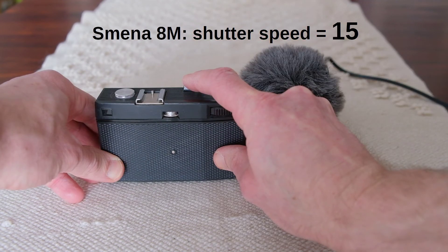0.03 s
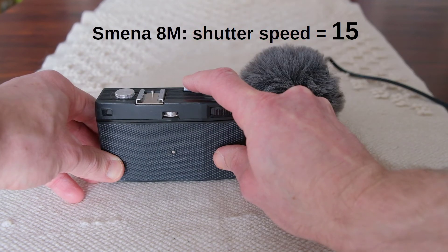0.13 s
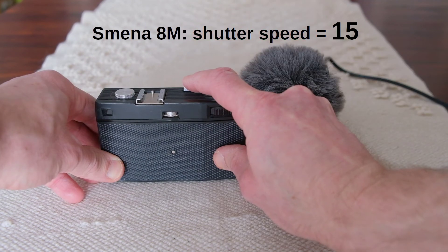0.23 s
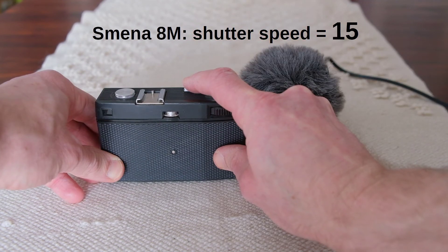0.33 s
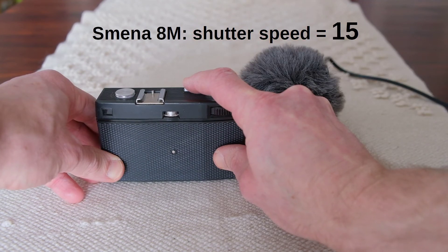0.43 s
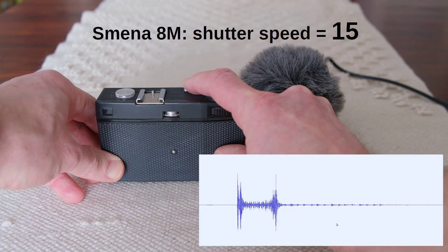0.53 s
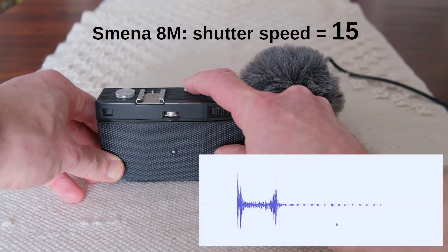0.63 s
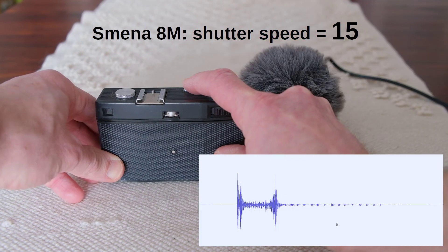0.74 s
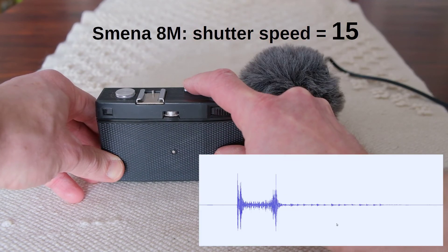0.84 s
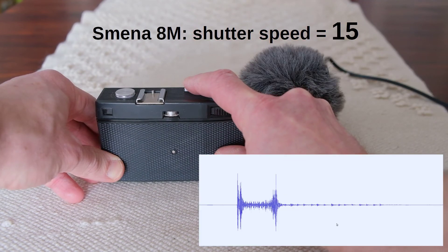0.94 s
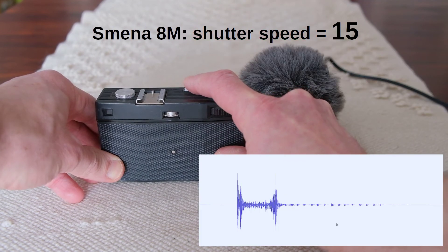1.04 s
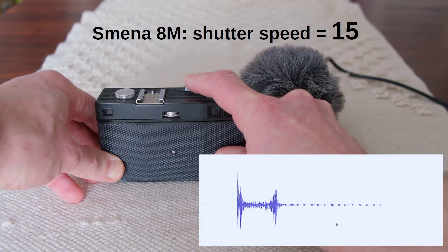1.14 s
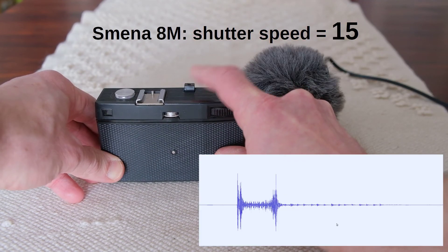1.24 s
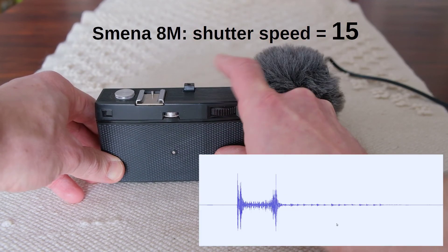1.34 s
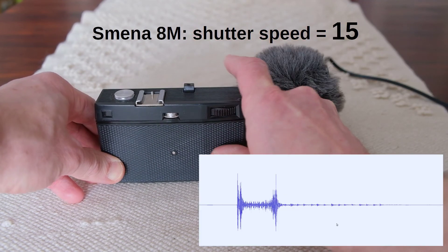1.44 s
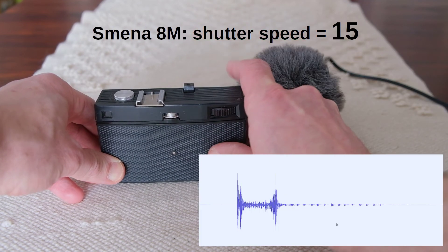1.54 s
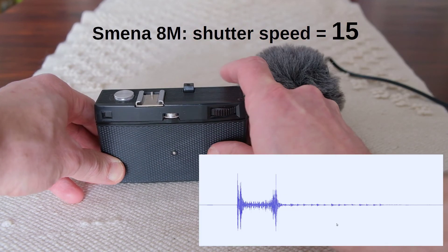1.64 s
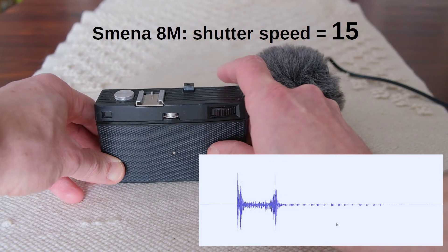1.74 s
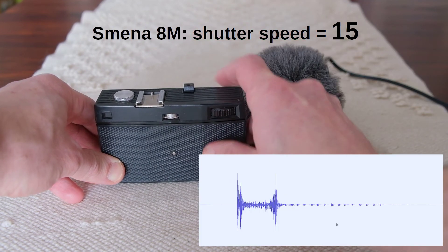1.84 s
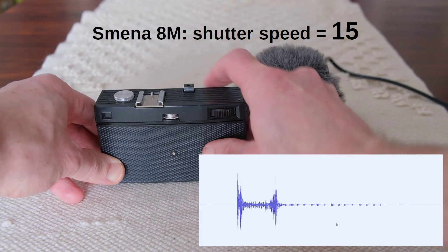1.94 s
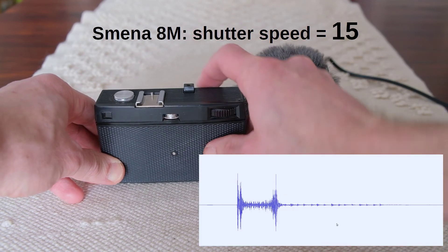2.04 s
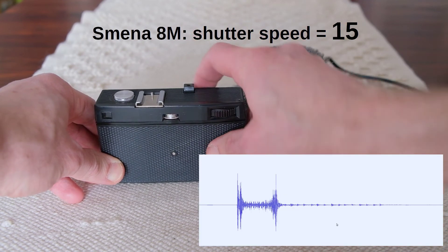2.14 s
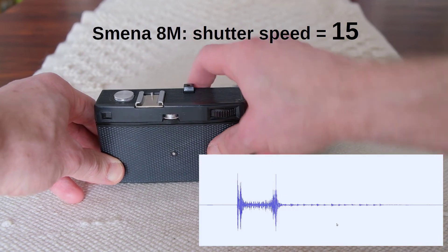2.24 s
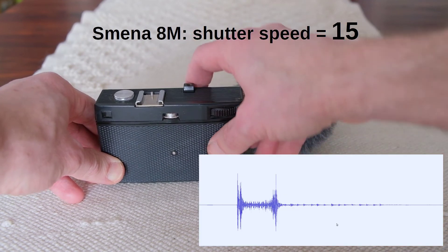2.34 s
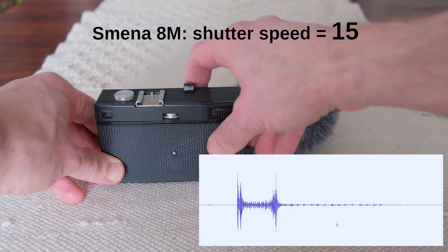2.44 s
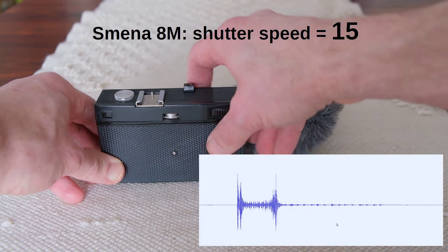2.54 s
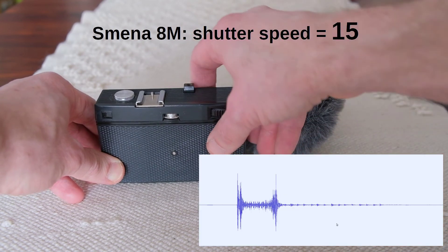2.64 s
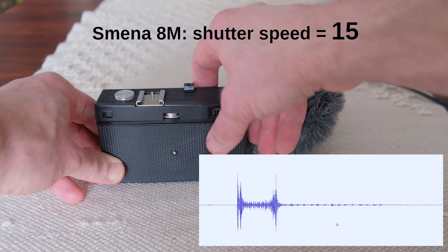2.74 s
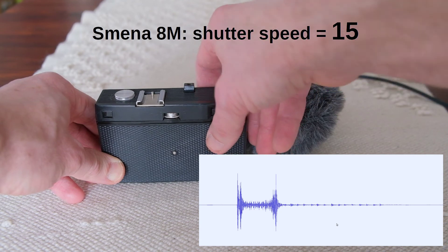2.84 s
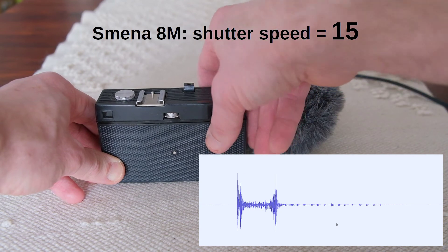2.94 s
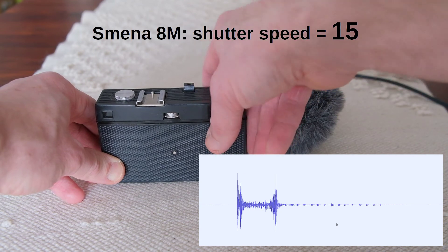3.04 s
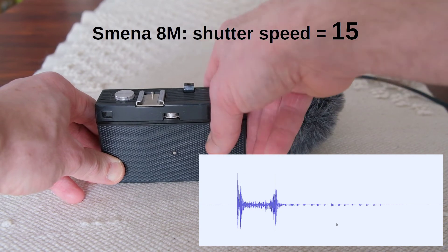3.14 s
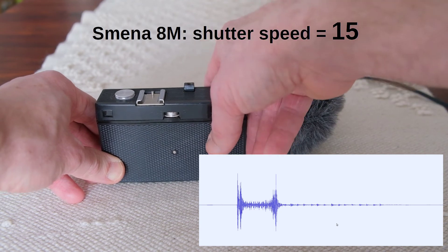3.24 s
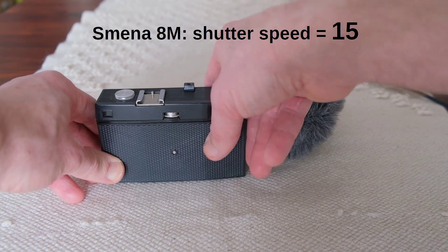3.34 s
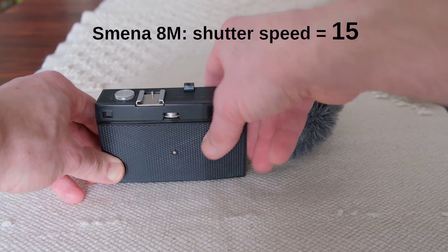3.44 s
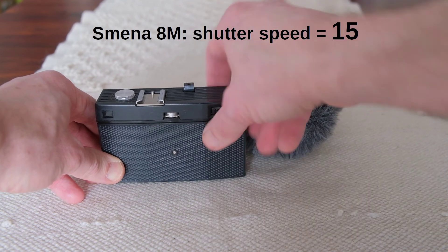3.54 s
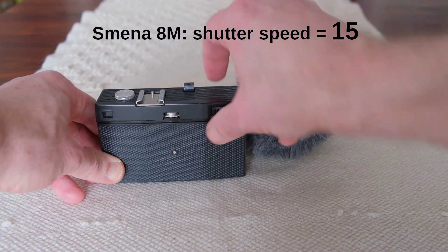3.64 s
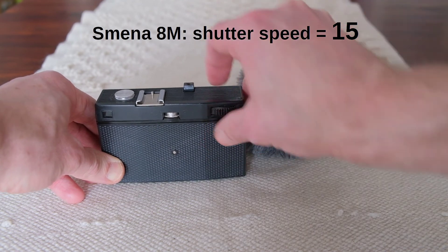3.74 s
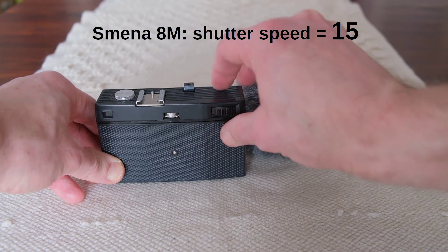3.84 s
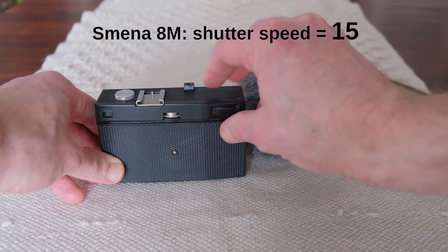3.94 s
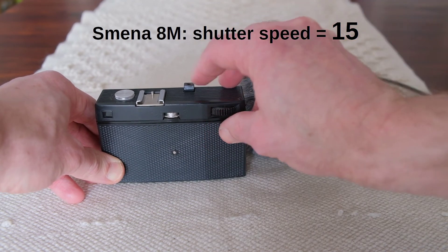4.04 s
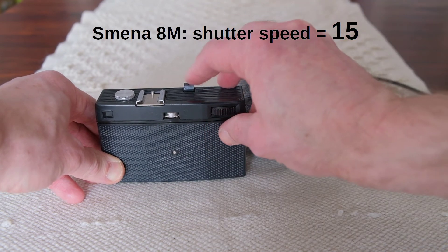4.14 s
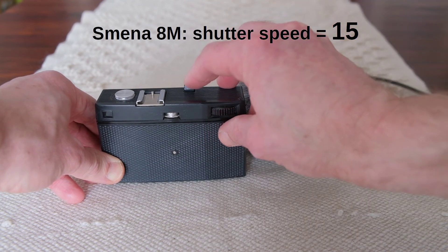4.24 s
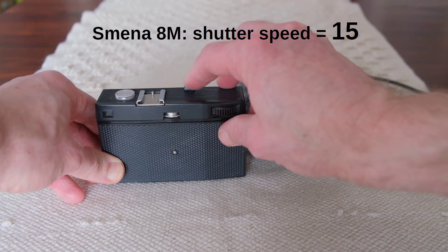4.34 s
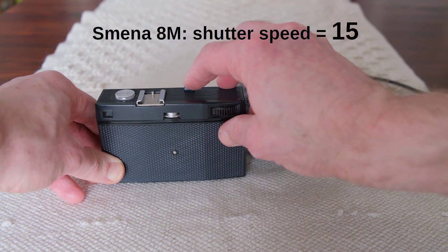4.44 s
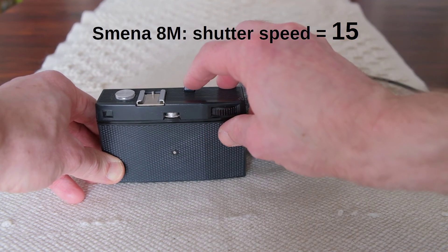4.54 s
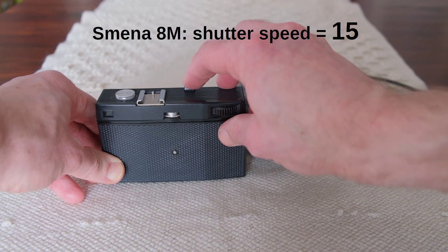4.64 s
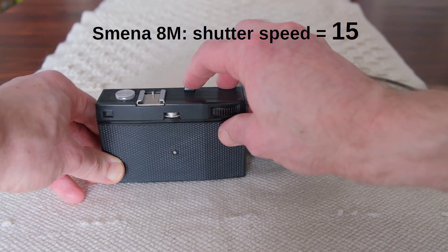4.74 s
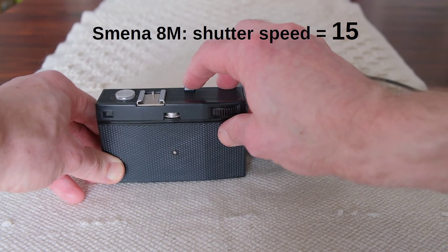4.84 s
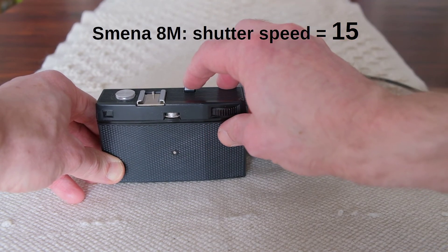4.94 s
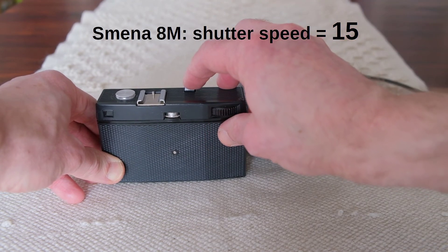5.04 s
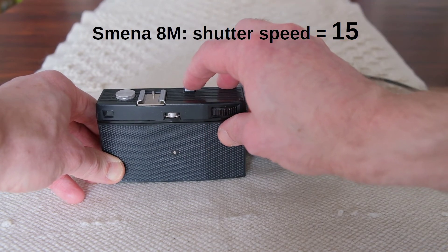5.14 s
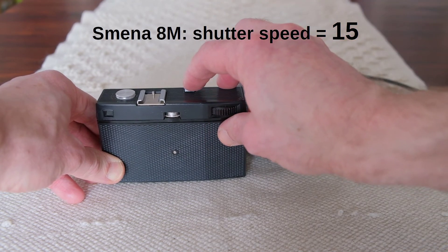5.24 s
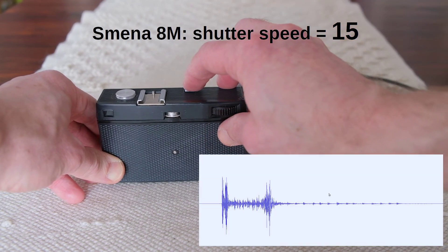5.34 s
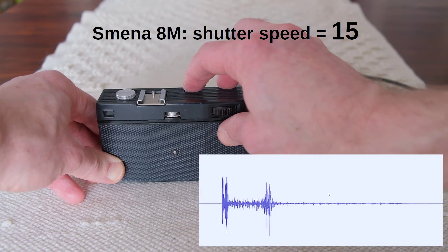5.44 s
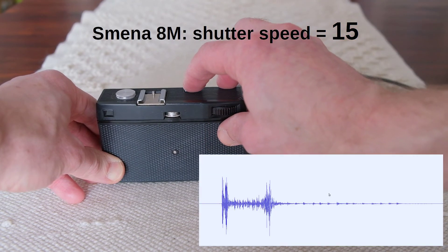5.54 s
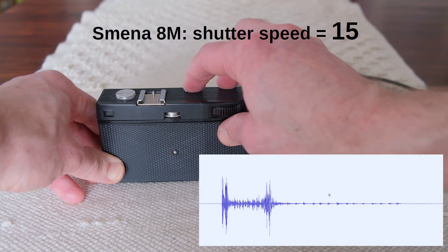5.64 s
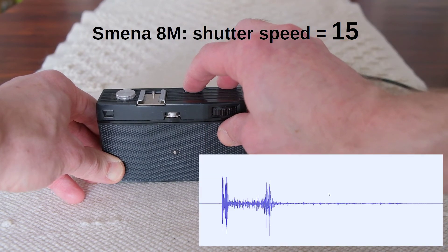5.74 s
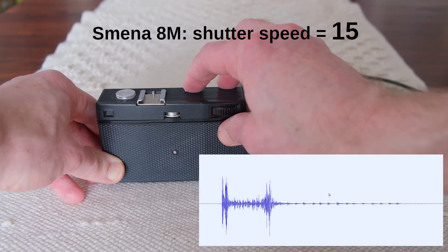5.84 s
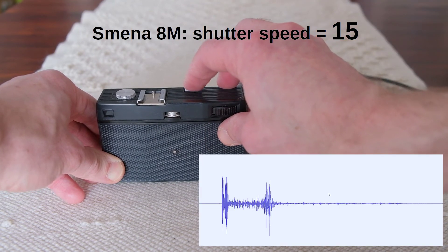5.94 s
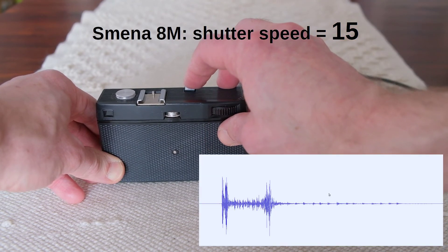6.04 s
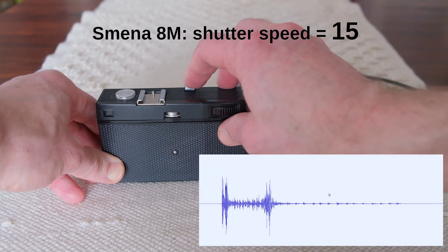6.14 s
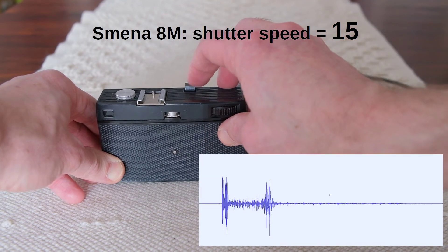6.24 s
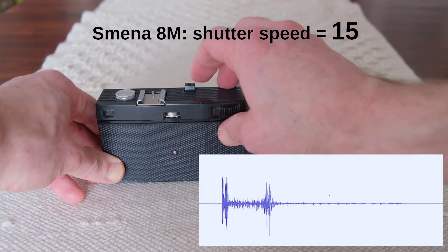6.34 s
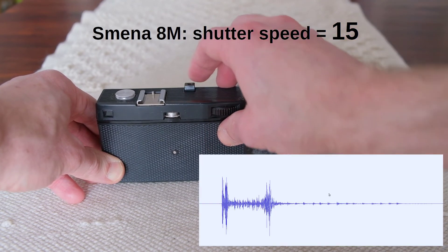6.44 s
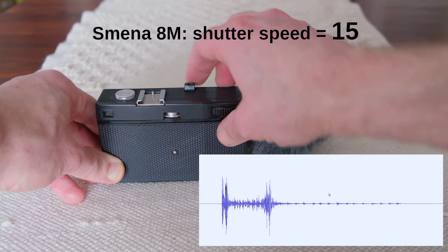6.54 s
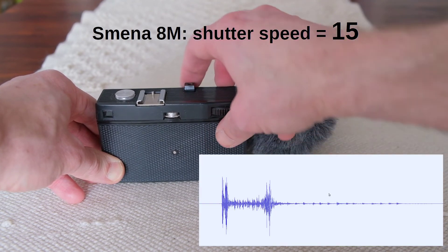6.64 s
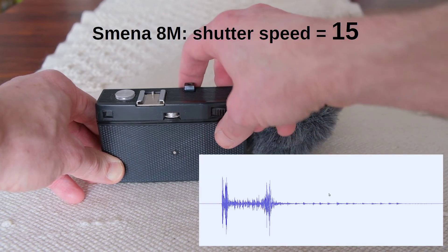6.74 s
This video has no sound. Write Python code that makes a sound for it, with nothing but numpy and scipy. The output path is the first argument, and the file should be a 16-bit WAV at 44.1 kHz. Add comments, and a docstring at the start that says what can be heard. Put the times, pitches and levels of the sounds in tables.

```python
"""The leaf shutter of a small film camera is fired, cocked and fired again close to a microphone in a quiet room.
Impacts of blades, escapement and gears excite the resonant housing, while struck steel rings on.
Between firings the hand shifts its grip, latches the cocking lever, drags over cloth and brushes
the microphone's fur: knocks excite the plastic case, and rubbing is coloured noise that swells and fades.
Arm rumble and still air lie beneath; a faint diffuse echo follows the sounds of the camera and table."""
import sys
import numpy as np
from scipy import signal
from scipy.fft import rfft, irfft, next_fast_len
from scipy.io import wavfile
from scipy.ndimage import uniform_filter1d

SR = 44100
rng = np.random.default_rng(int(sys.argv[2]) if len(sys.argv) > 2 else 0)


def master(y):
    """Save y as 16-bit WAV."""
    cut = np.clip(np.atleast_2d(y).T, -1, 1)
    pcm = np.round(cut * 32767)  # scale
    wavfile.write(sys.argv[1], SR, pcm.astype(np.int16))


N = 299439
TIME = np.arange(N) / SR   # seconds


def from_db(db):
    """Level law: decibels to amplitude gain."""
    return 10 ** (np.asarray(db) / 20)


def rms_one(x):
    """Power normalisation: scale to a root mean square of one."""
    return x / np.sqrt(np.mean(x ** 2) + 1e-20)


def at_hz(points, hz):
    """Spectral interpolation: read (Hz, value) points on a logarithmic frequency axis."""
    f, value = np.transpose(points)
    return np.interp(np.log(np.maximum(hz, 1)), np.log(f), value)


def add(track, s, sound):
    """Superposition: mix a short sound into a track at time s."""
    i = round(s * SR)
    track[i:i + len(sound)] += sound[:max(N - i, 0)]


def clicks(rows):
    """Impulsive excitation: one single-sample click for each (s, dB) row."""
    track = np.zeros(N)
    for s, db in rows:
        add(track, s, from_db([db]))
    return track


def noise(spectrum, grain_db=0, size=128):
    """Filtered random noise of unit power, its strength wandering between grains of size samples."""
    count = N // size + 2
    grains = np.interp(np.arange(N) / size, np.arange(count), rng.standard_normal(count))
    grainy = rng.standard_normal(N) * from_db(grain_db * grains)
    n = next_fast_len(N)
    hz = np.arange(n // 2 + 1) * SR / n
    colour = from_db(at_hz(spectrum, hz))
    return rms_one(irfft(rfft(grainy, n) * colour, n)[:N])


# each rub lies this far down at its two ends; roundness of its crest (1 = pointed)
STROKE_ENDS_DB, STROKE_ROUNDNESS = 19, 1.25


def strokes(rows):
    """Amplitude envelope of friction: each (middle s, length s, dB) rub swells and fades."""
    gain = np.zeros(N)
    for middle, length, db in rows:
        from_crest = np.minimum(np.abs(2 * (TIME - middle) / length), 4)
        gain += from_db(db - STROKE_ENDS_DB * from_crest ** STROKE_ROUNDNESS)
    return gain


def ring(plucks, hz, t60):
    """Free decay of one mode: a unit click starts a sine of height 1, 60 dB down after t60 seconds."""
    r, w = from_db(-60 / (t60 * SR)), 2 * np.pi * hz / SR
    return signal.lfilter([0, np.sin(w)], [1, -2 * r * np.cos(w), r * r], plucks + 1e-18)


def resonate(force, modes):
    """Modal superposition: parallel resonances of alternating sign respond to a force."""
    out = np.zeros(N)
    for k, (hz, width, db) in enumerate(modes):
        r = np.exp(-np.pi * width / SR)
        poles = [1, -2 * r * np.cos(2 * np.pi * hz / SR), r * r]
        response = (1 - r * r) / 2 * signal.lfilter([1, 0, -1], poles, force + 1e-18)
        out += (-1) ** k * from_db(db) * response
    return out


def minimum_phase(log_gain):
    """Causality: the minimum-phase filter with this gain, from the folded cepstrum."""
    cepstrum = irfft(log_gain)
    half = len(cepstrum) // 2
    cepstrum[1:half] *= 2
    cepstrum[half + 1:] = 0
    return np.exp(rfft(cepstrum))


# Where a blow's bright edge acts. Each row: frequency in Hz, weight on the edge level.
EDGE_SHARES = [(9500, 0.015), (11500, 1)]


def contact(impact_db, thud_db, edge_db, decay_ms, after_db, after_ms, thud_shares, size=4096, smooth_hz=130):
    """Impact force: a quickly dying rattle of tiny touches, then a fainter shiver of loose parts."""
    ms = 1000 * np.arange(size) / SR
    hz = np.arange(size // 2 + 1) * SR / size
    envelope = np.exp(-ms / decay_ms) + from_db(after_db) * np.exp(-ms / after_ms)
    rattle = rfft(rng.standard_normal(size) * envelope)
    # the hardness of the contact sets its spectrum; chance sets only its fine structure
    power = uniform_filter1d(np.abs(rattle) ** 2, max(round(smooth_hz / hz[1]), 1))
    colour = from_db(impact_db + thud_db * at_hz(thud_shares, hz) + edge_db * at_hz(EDGE_SHARES, hz))
    return irfft(rattle * minimum_phase(np.log(colour / np.sqrt(power))))[:size // 2]


# The moving arm. Each row: time in seconds, rumble level in dB before the trim.
ARM_LEVEL = [(0.0, -71), (0.74, -65), (1.28, -67.5), (1.53, -64.5), (2.15, -56.5), (2.31, -54), (2.46, -52),
             (2.91, -63.5), (3.29, -59), (3.48, -61.5), (3.74, -61), (4.1, -69), (4.39, -73.5), (4.61, -73),
             (4.73, -70), (5.35, -70.5), (5.45, -71.5), (6.79, -68.5)]
# Colour of the rumble. Each row: frequency in Hz, relative level in dB.
RUMBLE_COLOUR = [(12, -33), (20, 8.5), (59, -14), (174, -23), (225, -28.5), (263, -28), (392, -35),
                 (600, -32), (780, -64.5), (1320, -120)]


def arm_rumble(trim_db=6.0):
    """Structure-borne noise: the arm moving on the table gives a low, slowly varying rumble."""
    level_db = trim_db + np.interp(TIME, *np.transpose(ARM_LEVEL))
    return from_db(level_db) * noise(RUMBLE_COLOUR, grain_db=2.0, size=1024)


# Colour of the quiet room's air. Each row: frequency in Hz, relative level in dB.
AIR_COLOUR = [(59, -30), (100, -1.5), (166, -11), (295, -15), (595, -23), (648, -12.5), (691, -21.5),
              (752, -19), (1520, -24.5), (3400, -28.5), (6700, -30.5), (15000, -29.5), (16000, -39)]


def air(level_db=-73.5):
    """Stationary background noise: the air of the room at a steady level."""
    return from_db(level_db) * noise(AIR_COLOUR)


# Hard clicks: a tap, the mechanism coming to rest, the cocking lever and the case.
# Each row: time in seconds, impact level in dB, thud in dB, edge in dB, rattle decay in ms.
HARD_CLICKS = [(0.081, -43, 17, -6, 6.6), (0.7723, -30.5, -2, -2, 1.1), (2.423, -30.5, 9.5, 6, 1),
               (2.5195, -23.5, 15, -13, 6.4), (2.555, -19, 5, -9, 2.4), (2.6637, -26.5, 3.5, -6, 3.4),
               (2.988, 5.5, -5.5, -4, 1.3), (3.0762, -3, 1, 1, 2.8), (3.0905, -6, 4, -4, 1.7),
               (3.0930, 7, -2.5, -9.5, 1.8), (3.2016, -16.5, 11.5, -31, 2.1), (5.964, -34, -1, -1, 4.5),
               (5.99, -40.5, 17, -3, 3), (6.12, -46.5, 16, -11, 2.1), (6.514, -35, 15.5, -15, 2.1)]
# Where a hard click's thud acts. Each row: frequency in Hz, weight on the thud level.
CASE_THUD_SHARES = [(700, 1.02), (1500, 0.9), (2200, 0.72), (3500, 0.028)]


def hard_clicks():
    """Hard impact: a tap, the mechanism coming to rest, the cocking lever and the case, as a force on the case."""
    force = np.zeros(N)
    for s, db, thud_db, edge_db, decay_ms in HARD_CLICKS:
        click = contact(db, thud_db, edge_db, decay_ms, after_db=-31, after_ms=5.9,
                        thud_shares=CASE_THUD_SHARES)
        add(force, s, click)
    return force


# Soft bumps of the hand on the padded table. Each row: time in seconds, level in dB.
HAND_BUMPS = [(0.083, -40), (1.785, -54), (1.914, -52.5), (3.094, -40.5), (3.81, -44), (4.56, -52.5),
              (5.95, -50)]


def table_bumps():
    """Damped low modes: a bump of the hand sets two short-lived resonances of the table going."""
    bumps = clicks(HAND_BUMPS)
    return ring(bumps, hz=80, t60=0.072) + from_db(-6.5) * ring(bumps, hz=138.0, t60=0.071)


# The firings, also read by the escapement and gears. Each row: release in seconds, exposure in seconds,
# escapement beats per second, extra thud on closing in dB, extra edge on opening in dB,
# wait from closing to the gears' return in seconds.
FIRINGS = [(0.5400, 0.0555, 345, 1.15, -3.5, 0.0228), (5.374, 0.0555, 380, -1.3, 3, 0.0215)]
# The blades fly open and hit their stop. Each row: delay after release in seconds, impact level in dB,
# thud in dB, edge in dB, rattle decay in ms, spring pluck in dB.
OPENING_BLOWS = [(0, 22, -1, -5.5, 1.15, -30), (0.0043, 18.5, -3.5, 1.2, 1.3, -20.5)]
# They scrape together and slam shut. Each row: delay from the end of the exposure in seconds,
# then impact, thud, edge, rattle decay and spring pluck in the same units.
CLOSING_BLOWS = [(-0.0039, 15.8, 0, -4, 2.2, -29), (0, 17, 6.5, -1.5, 0.9, -25)]
# Where the thud of blades, and of gear ticks, acts. Each row: frequency in Hz, weight on the thud level.
BLADE_THUD_SHARES = [(450, 0.35), (1200, 1.0), (2750, 1.1), (3200, 0.018)]


def blades():
    """Impulsive impact: two blows open the shutter and two close it; gives housing force and spring plucks."""
    force, plucks = np.zeros(N), np.zeros(N)
    for release, exposure, _, slam_db, snap_db, _ in FIRINGS:
        opening = release, OPENING_BLOWS, 0, snap_db
        closing = release + exposure, CLOSING_BLOWS, slam_db, 0
        for start, blows, heavy_db, bright_db in (opening, closing):
            for delay, db, thud_db, edge_db, decay_ms, pluck_db in blows:
                blow = contact(db, thud_db + heavy_db, edge_db + bright_db, decay_ms,
                               after_db=-33, after_ms=6, thud_shares=BLADE_THUD_SHARES)
                add(force, start + delay, blow)
                add(plucks, start + delay, from_db([pluck_db]))
    return force, plucks


# Where an escapement beat's thud acts. Each row: frequency in Hz, weight on the thud level.
BEAT_THUD_SHARES = [(300, 3.5), (1000, 0.73), (2700, 0.57), (3200, -0.5)]
# engages this long after release; mean strength of a beat
ESCAPEMENT_DELAY_S, BEAT_DB = 0.0125, 2.5


def escapement(thud_db=-2.0, edge_db=-2.0, decay_ms=0.85, uneven_db=1.5, jitter_s=0.00035):
    """Near-periodic impacts: the anchor rocks on the star wheel during the exposure, a slightly uneven buzz."""
    force = np.zeros(N)
    for release, exposure, per_s, *_ in FIRINGS:
        for s in release + np.arange(ESCAPEMENT_DELAY_S, exposure, 1 / per_s):
            late, strong = rng.standard_normal(2)
            beat = contact(BEAT_DB + uneven_db * strong, thud_db, edge_db, decay_ms,
                           after_db=-22.5, after_ms=2, thud_shares=BEAT_THUD_SHARES)
            add(force, s + jitter_s * late, beat)
    return force


# one tick per tooth at this spacing; strength and thud of the first tick, before chance
TOOTH_S, TICK_DB, TICK_THUD_DB = 0.01003, -7.0, -4.0
TICK_FADE_DB_PER_S = 31   # the ticks weaken as the spring unwinds


def gears(count=14, uneven_db=2.5, uneven_thud_db=4.5, jitter_s=0.0005, pluck_db=-44):
    """Impact train: gears run back steadily, each tooth with its own strength and colour; force and plucks."""
    force, plucks = np.zeros(N), np.zeros(N)
    for release, exposure, *_, wait in FIRINGS:
        for tooth, (late, strong, dull) in enumerate(rng.standard_normal((count, 3))):
            run_s = tooth * TOOTH_S
            s = release + exposure + wait + run_s + jitter_s * late
            db = TICK_DB - TICK_FADE_DB_PER_S * run_s + uneven_db * strong
            thud_db = TICK_THUD_DB + uneven_thud_db * dull
            tick = contact(db, thud_db, edge_db=-2.0, decay_ms=0.8, after_db=-23, after_ms=4.0,
                           thud_shares=BLADE_THUD_SHARES)
            add(force, s, tick)
            add(plucks, s, from_db([db + pluck_db]))
    return force, plucks


# Modes of the steel spring and blades. Each row: frequency in Hz, level in dB, decay by 60 dB in seconds.
STEEL_MODES = [(1256, -8, .08), (1506, -8.5, 0.041), (2490, -5.5, .05), (2830, -10, .06),
               (4190, -11.5, 0.024), (6640, 4.5, .04), (7050, -3.5, .025), (12600, -14.5, .025),
               (16000, -12.5, .03)]


def spring(plucks):
    """Free vibration: the lightly damped steel parts ring on after a blow."""
    return sum(from_db(db) * ring(plucks, hz, t60) for hz, db, t60 in STEEL_MODES)


# Resonances of the shutter housing. Each row: frequency in Hz, width in Hz, level in dB.
HOUSING_MODES = [(130, 100, -18), (286, 68, -6.5), (518, 150, -3), (770, 68, -1), (1057, 140, -3),
                 (1300, 170, -1), (1590, 250, 0.5), (1880, 470, -2), (2180, 200, 1), (2550, 130, -3),
                 (2830, 200, -2.5), (3220, 200, -3.5), (3750, 300, -3), (4200, 250, 1), (4850, 310, -2),
                 (5700, 600, -9), (6540, 430, -3), (7808, 830, 0), (9250, 670, -2), (9790, 400, -3),
                 (12600, 640, -7), (14800, 700, -5), (14200, 1400, -5.5)]


def shutter():
    """Forced vibration: blades, escapement and returning gears all shake the same housing."""
    blade_force, blade_plucks = blades()
    gear_force, gear_plucks = gears()
    housing = resonate(blade_force + gear_force + escapement(), HOUSING_MODES)
    return housing + spring(blade_plucks + gear_plucks)


# Skin sliding on the case. Each row: middle in seconds, length in seconds, crest level in dB.
SKIN_SLIDES = [(1.16, 0.23, -72.5), (1.455, 0.29, -66.5), (1.655, .12, -78.5), (1.79, 0.03, -68.5),
               (1.862, 0.051, -64), (1.935, 0.11, -71.5), (2.38, 1, -68), (2.523, 0.086, -57.5),
               (2.83, 0.25, -75), (3.25, 0.31, -72.5), (3.396, 0.036, -57), (3.535, 0.47, -60),
               (3.79, .08, -68), (4.085, .06, -73), (5.975, 0.13, -69), (6.22, 0.18, -72.5)]
# Colour of the skin noise. Each row: frequency in Hz, relative level in dB.
SKIN_COLOUR = [(150, -19.5), (250, -1), (486, -10), (754, 1.5), (1010, -5), (1370, -2.5), (3250, -16),
               (3770, -12.5), (4420, -17), (6000, -20.5), (7800, -19.5), (13200, -120)]


def skin_slides():
    """Sliding friction: skin on the case gives a fine-grained hiss."""
    return strokes(SKIN_SLIDES) * noise(SKIN_COLOUR, grain_db=2.5)


# Soft knocks of fingers, and of the lever rattling in its seat after latching.
# Each row: time in seconds, impact level in dB, rattle decay in ms.
SOFT_KNOCKS = [(1.166, -47.5, 4.6), (1.913, -46.5, 2.2), (2.538, -39, 2), (3.104, -31.5, 12),
               (3.134, -26.5, 15), (3.165, -41, 6.3), (3.19, -30.5, 5.9), (3.214, -32, 4.8),
               (3.287, -46, 3.5), (3.39, -40, 7.8), (4.196, -55, 2)]
# Where a soft knock's thud acts. Each row: frequency in Hz, weight on the thud level.
SOFT_THUD_SHARES = [(700, 1.03), (1400, 1.03), (2200, 0.55), (3500, 0.046)]


def soft_knocks(thud_db=26.5, edge_db=-9):
    """Soft impact: soft contacts give blows strong in thud and weak in edge, as a force on the case."""
    force = np.zeros(N)
    for s, db, decay_ms in SOFT_KNOCKS:
        knock = contact(db, thud_db, edge_db, decay_ms, after_db=-35, after_ms=7, thud_shares=SOFT_THUD_SHARES)
        add(force, s, knock)
    return force


# Fingers brushing the fur. Each row: middle in seconds, length in seconds, crest level in dB before the trim.
FUR_BRUSHES = [(1.45, 0.24, -82), (1.86, 0.3, -78.5), (2.23, 0.88, -80.5), (2.42, 0.1, -74),
               (3.43, 0.12, -69), (3.58, .3, -63), (3.776, 0.11, -71)]
# Colour of the fur noise. Each row: frequency in Hz, relative level in dB.
FUR_COLOUR = [(2060, -24), (3500, -5.5), (3920, 1), (4430, -6), (7270, 3.5), (8690, 5.5), (10900, -7),
              (14300, -4), (16000, -37)]


def fur_brushes(trim_db=0.5):
    """Fibre friction: fingers on the microphone's fur give a bright, very fine-grained hiss."""
    return from_db(trim_db) * strokes(FUR_BRUSHES) * noise(FUR_COLOUR, grain_db=2.5, size=64)


# The heel of the hand on the cloth. Each row: middle in seconds, length in seconds, crest level in dB.
HAND_DRAGS = [(2.47, .65, -61), (3.70, 0.41, -62.5)]
# Colour of the cloth noise. Each row: frequency in Hz, relative level in dB.
CLOTH_COLOUR = [(60, -14), (140, 2.5), (300, -8), (550, -20), (1200, -45)]


def cloth_drags():
    """Sliding friction: the heel of the hand drags over the cloth with a low, coarse-grained rub."""
    return strokes(HAND_DRAGS) * noise(CLOTH_COLOUR, grain_db=4.0, size=512)


# The lever against its spring. Each row: middle in seconds, length in seconds, crest level in dB.
LEVER_RUBS = [(2.98, 0.14, -62.5), (3.07, 0.36, -60.5)]


def lever_drags():
    """Dry friction: the lever drags against its spring, a grainy noise force on the case."""
    return strokes(LEVER_RUBS) * noise([(1000, -2), (8000, -11.5)], grain_db=4, size=32)


# Resonances of the plastic case and lever. Each row: frequency in Hz, width in Hz, level in dB.
CASE_MODES = [(167, 170, -12.5), (782.6, 81, 1.5), (1100.7, 116, -1.5), (1270, 230, -2.5),
              (1627, 330, -3.5), (2159, 180, 1.5), (2860, 540, 2), (3910, 260, 3.5), (4290, 440, -2),
              (6070, 1800, -3.5), (8170, 1150, 3), (10500, 2800, -6.5), (13070, 1600, -0.5)]


def case():
    """Forced vibration: hard clicks, soft knocks and the dragging lever sound through the same plastic case."""
    return resonate(hard_clicks() + soft_knocks() + lever_drags(), CASE_MODES)


# The spring plucked as the lever latches. Each row: time in seconds, level in dB.
LATCH_TWANGS = [(2.9885, -38.5), (3.0755, -42), (3.094, -63.5)]


def latch():
    """Impulse response: the latching lever plucks the spring, which twangs."""
    return spring(clicks(LATCH_TWANGS))


# A fingertip along the ribbed case. Each row: middle in seconds, length in seconds, crest level in dB.
RIB_RASPS = [(3.68, 0.35, -69), (3.78, 0.076, -66), (4.005, 0.081, -75.5)]
# Colour of the rasp. Each row: frequency in Hz, relative level in dB.
RIB_COLOUR = [(3000, -20), (5400, -21), (6050, -5.5), (6700, -22), (10000, -33)]


def rasps():
    """Rough-surface friction: a fingertip rasps along the ribbed case, heard as peaked noise."""
    return strokes(RIB_RASPS) * noise(RIB_COLOUR)


# The freed lever under the fingertip. Each row: time in seconds, level in dB before the trim.
LEVER_PINGS = [(4.688, -46), (5.873, -36), (5.964, -38), (6.12, -40), (6.514, -27.5)]


def pings(trim_db=-22):
    """Free decay: the freed lever pings as a single short mode."""
    return from_db(trim_db) * ring(clicks(LEVER_PINGS), hz=3830, t60=0.014)


# The fingertip on the lever. Each row: middle in seconds, length in seconds, crest level in dB.
FINGERTIP_SCUFFS = [(5.97, 0.14, -70.5), (6.225, 0.081, -76), (6.75, .2, -83)]
# Colour of the scuff. Each row: frequency in Hz, relative level in dB.
LEVER_COLOUR = [(1200, -25), (2300, -4), (3100, -17), (3820, 1), (4500, -22), (9000, -24)]


def lever_scuffs():
    """Friction-excited resonance: a scuffing fingertip makes the lever sing faintly, as peaked noise."""
    return strokes(FINGERTIP_SCUFFS) * noise(LEVER_COLOUR, grain_db=3.0)


# Strength of the echo. Each row: frequency in Hz, gain in dB.
ECHO_COLOUR = [(100, -28), (300, -21), (600, -24.5), (1400, -23.5), (2500, -28), (4000, -31), (7000, -30),
               (10000, -39.5), (16000, -41.5)]
# Length of the echo. Each row: frequency in Hz, decay by 60 dB in seconds.
ECHO_T60 = [(100, 0.22), (1500, .62), (4000, .55), (8000, 0.27), (16000, .22)]


def room(x, build_s=0.064):
    """Diffuse reverberation: a faint echo builds up, then dies, lasting longest in mid-spectrum."""
    t, response = TIME[:SR], np.zeros(SR)
    edges = np.geomspace(90, 17000, 16)
    for low, high in zip(edges, edges[1:]):
        hz = np.sqrt(low * high)
        band_pass = signal.butter(2, [low, high], "band", fs=SR, output="sos")
        band = signal.sosfilt(band_pass, rng.standard_normal(SR))
        decay = np.exp(-np.log(1000) * t / at_hz(ECHO_T60, hz))
        band = band * decay * (1 - np.exp(-t / build_s))
        unit_gain = np.sqrt(2 * (high - low)) / SR   # makes the mean gain within the band about one
        response += from_db(at_hz(ECHO_COLOUR, hz)) * rms_one(band) * unit_gain
    return signal.fftconvolve(x, response)[:N]


def scene():
    """Superposition at one microphone, which feeds both channels."""
    rubbing = skin_slides() + fur_brushes() + cloth_drags() + rasps()
    background = arm_rumble() + air() + rubbing
    camera = table_bumps() + shutter() + case() + latch() + pings() + lever_scuffs()
    return np.tile(camera + room(camera) + background, (2, 1))


# Faint steady noise, independent in each channel. Each row: frequency in Hz, relative level in dB.
FAINT_NOISE_COLOUR = [(50, 11.5), (300, 2.5), (2000, 2), (16000, -3)]
CUTOFF_HZ = 16000


def record(dry, noise_db=-92, imbalance_db=0.05):
    """Saturation and band limiting: two nearly equal channels, each with faint noise; peaks round, top is cut."""
    faint_noise = from_db(noise_db) * np.array([noise(FAINT_NOISE_COLOUR), noise(FAINT_NOISE_COLOUR)])
    channels = dry * from_db([[imbalance_db], [-imbalance_db]]) + faint_noise
    rounded = channels / (1 + (channels / .92) ** 6) ** (1 / 6)   # peaks level off towards 0.92
    low_pass = signal.ellip(12, .1, 100, CUTOFF_HZ, fs=SR, output="sos")
    return signal.sosfilt(low_pass, rounded)


dry = scene()
out = record(dry)
master(out)
```